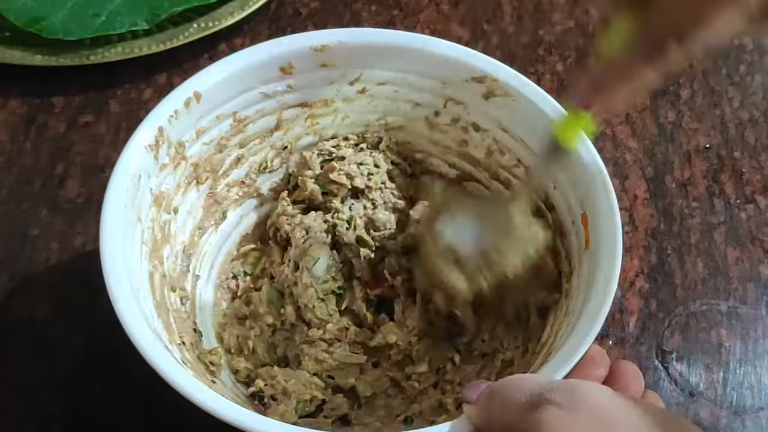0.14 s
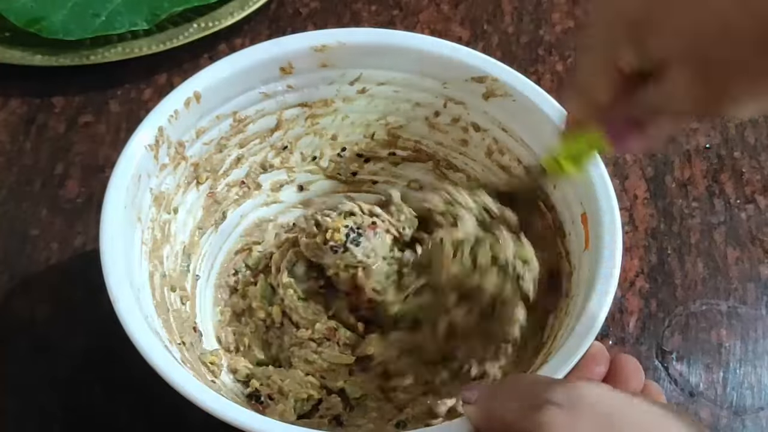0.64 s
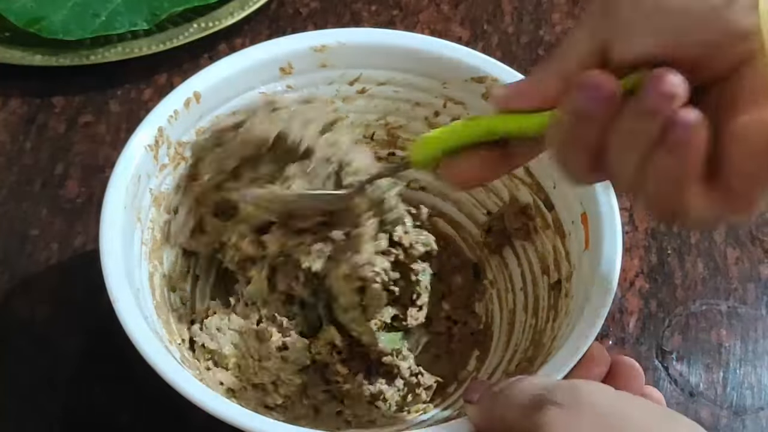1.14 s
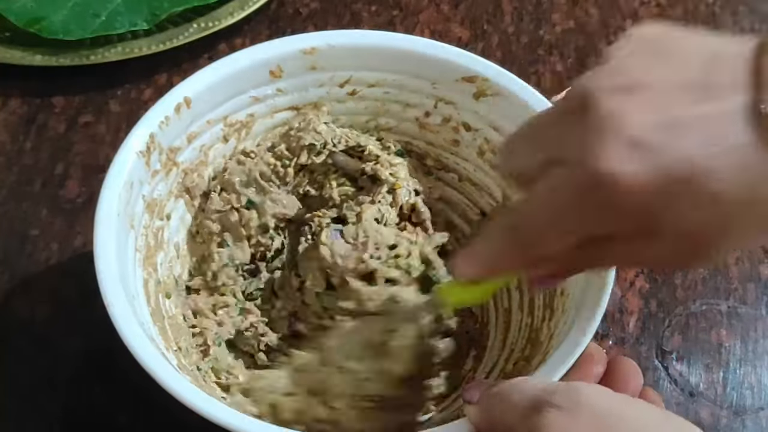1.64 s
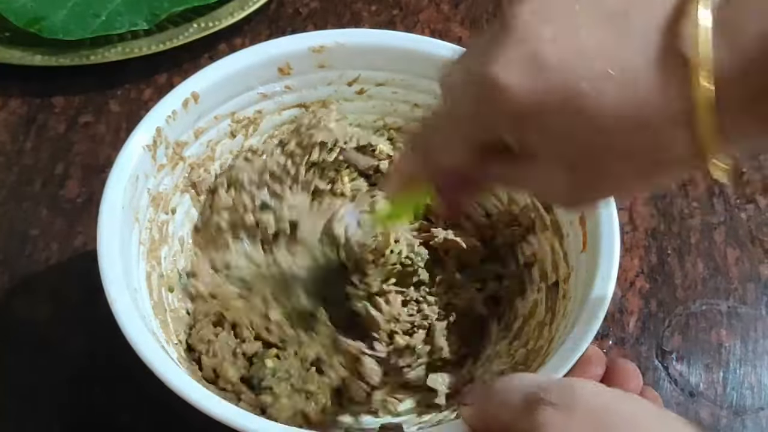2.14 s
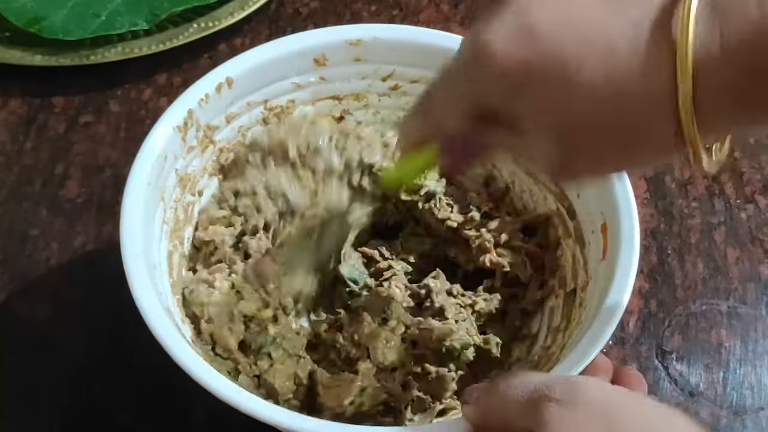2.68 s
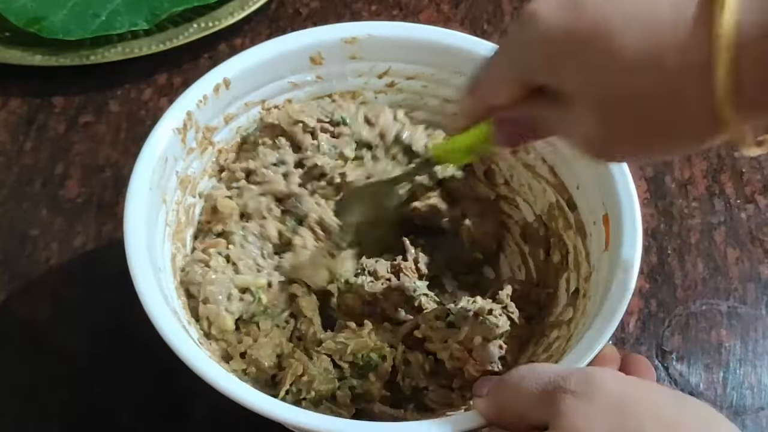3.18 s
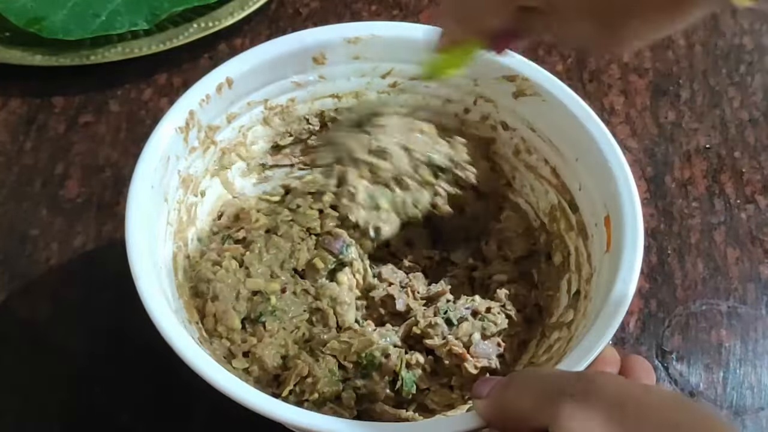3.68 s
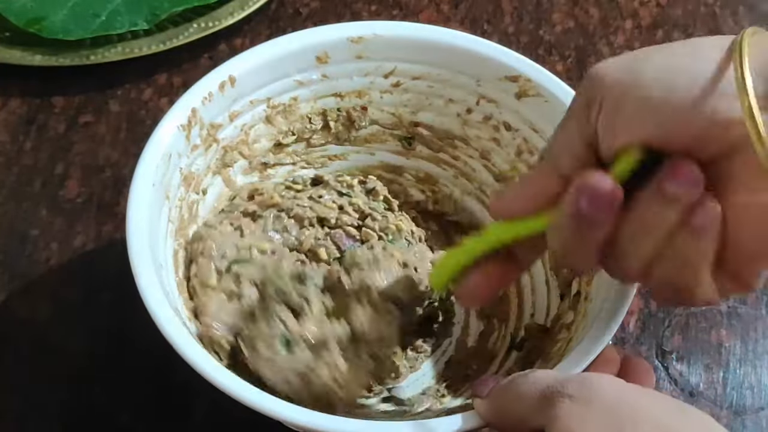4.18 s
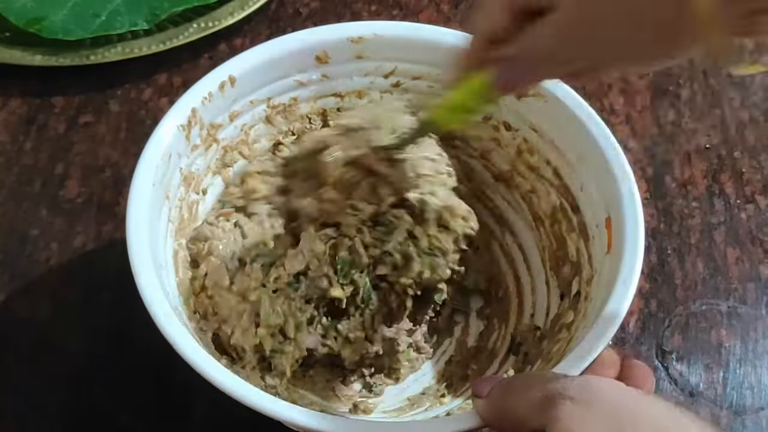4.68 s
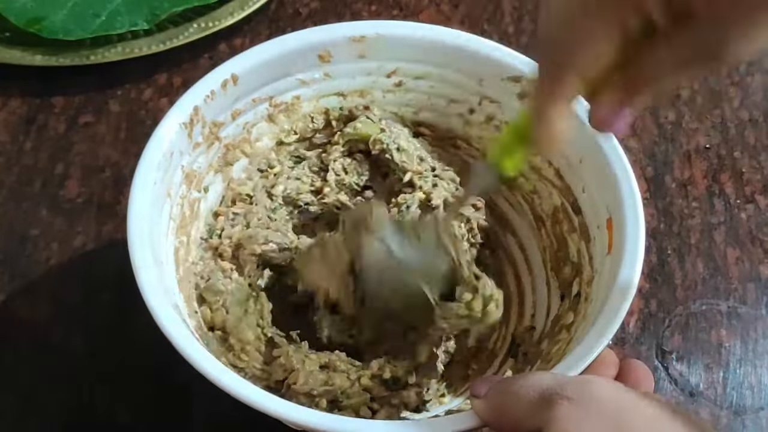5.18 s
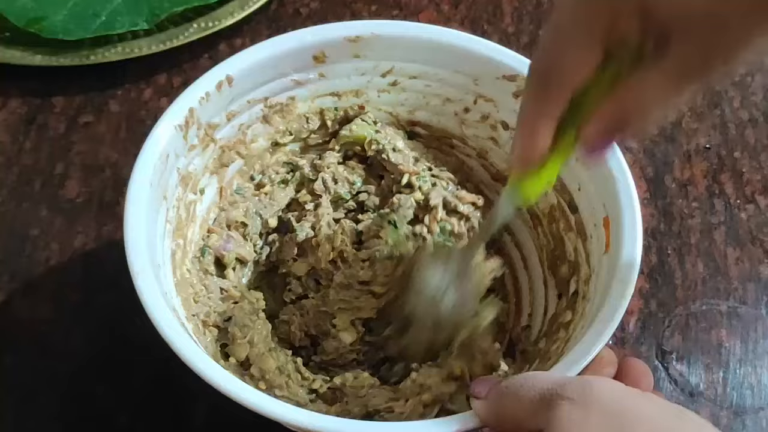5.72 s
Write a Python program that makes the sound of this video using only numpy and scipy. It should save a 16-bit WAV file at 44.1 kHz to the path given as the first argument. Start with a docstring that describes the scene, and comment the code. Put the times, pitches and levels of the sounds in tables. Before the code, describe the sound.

A metal spoon stirs thick, wet batter in a plastic bowl, recorded close in stereo in a small, reflective kitchen. From 0 to 0.3 s a fast sweep swells into a broad rubbing hiss with dense crackle, then drops abruptly to scattered pops. A light knock comes at about 1 s, followed by sticky ticks and softer crackling. A distant crow gives three short, hoarse caws at about 1.1, 1.9 and 2.75 s. The loudest hard, quickly damped knock hits at 2.3 s; a sharp cracking double knock follows at 3.03 s. Another brief hissing sweep passes at 3.35 s. From 3.6 s the work is sparser: small wet pops, ticks and faint taps, with clearer knocks at 5.2 and 5.5 s. Low draught buffeting comes and goes at left, strongest in the first 0.7 s, around 2.5-2.9 s and after 5.2 s. Faint machine hum, room murmur and steady microphone hiss lie beneath.

```python
"""A metal spoon sweeps hissing and rubbing through thick wet batter in a plastic bowl, close to two ports.
The batter crackles, ticks and pops (shaped noise and gliding sines); the spoon knocks the bowl (decaying
modes and noise cracks). Sharp sounds come back from the kitchen walls. A draught buffets the left port (low
noise), a machine hums (wavering sines), a crow caws far outside (shaky pulses through a beak), over a steady
low room murmur and microphone hiss (shaped noise)."""
import sys
import numpy as np
from scipy import signal
from scipy.fft import rfft, irfft
from scipy.io import wavfile
from scipy.ndimage import uniform_filter1d

SR = 44100
rng = np.random.default_rng(int(sys.argv[2]) if len(sys.argv) > 2 else 0)


def store_wav(level_fs):
    """Save 16-bit WAV to argv[1]."""
    pcm = np.round(np.clip(np.atleast_2d(level_fs), -1, 1) * 32767)
    wavfile.write(sys.argv[1], SR, pcm.T.astype(np.int16))


def natural_amplitude(level_db):
    """Convert a level in decibels to a linear amplitude factor, elementwise."""
    exponent = np.asarray(level_db, float) / 20
    return 10 ** exponent


N = 256960


def evened(x):
    """Scales to an rms of 1."""
    return x / np.sqrt(np.mean(x ** 2) + 1e-20)


def wander(shape, samples):
    """Random drift of rms 1: noise averaged over a number of samples."""
    return evened(uniform_filter1d(rng.standard_normal(shape), samples))


def band(x, order, low_hz, high_hz):
    """Butterworth band-pass."""
    return signal.sosfilt(signal.butter(order, [low_hz, high_hz], "band", fs=SR, output="sos"), x)


def read(points, hz):
    """Reads a spectrum on a log-frequency axis."""
    f, value = np.transpose(points)
    return np.interp(np.log(hz + 1), np.log(f + 1), value)


def causal(points):
    """Minimum-phase impulse response of a spectrum."""
    gain_db = read(points, abs(np.fft.fftfreq(4096, 1 / SR)))
    log_gain = np.log(natural_amplitude(gain_db))
    return np.fft.ifft(np.exp(np.conj(signal.hilbert(log_gain)))).real[:1024]


def curves(rows):
    """The columns of a table at every sample."""
    s, *columns = np.transpose(rows)
    return [np.interp(np.arange(N) / SR, s, c) for c in columns]


def add(mix, s, sound):
    """Mixes a sound in at a time."""
    part = mix[..., round(s * SR):][..., :sound.shape[-1]]
    part += sound[..., :part.shape[-1]]


# Response of each port with its cavity peak. Each row: frequency in Hz, gain in dB.
LEFT_PORT_HZ_DB = [(30, -4.5), (500, 6), (1200, -6.5), (4000, 10), (6000, 9.5), (7600, 18), (8900, 21.5),
                   (9600, 10), (10500, -3), (16000, -3)]
RIGHT_PORT_HZ_DB = [(30, -4), (500, -3.5), (850, -3), (1300, -6), (4000, 11.5), (6000, 18), (7600, 29),
                    (8900, 12.5), (10200, -6), (16000, 0.5)]


def ports():
    """Impulse responses of both ports; sound reaches the left one a little later."""
    left_lag_s = 0.00012
    left = np.roll(causal(LEFT_PORT_HZ_DB), round(left_lag_s * SR))
    return np.array([left, causal(RIGHT_PORT_HZ_DB)])


def heard(x):
    """A pair of signals through the ports, at rms 1."""
    return evened(signal.oaconvolve(x, ports(), axes=1)[:, :N])


def sided(sound, left_over_right_db):
    """Equal energy at both ports, tilted left or right; the mean of the ports peaks at 1."""
    tilt = natural_amplitude(np.array([[left_over_right_db / 2], [-left_over_right_db / 2]]))
    sound = sound / np.sqrt((sound ** 2).sum(1, keepdims=True)) * tilt
    return sound / abs(sound.mean(0)).max()


# Decay of the kitchen echo. Each row: frequency in Hz, t60 in s.
KITCHEN_HZ_T60_S = [(200, 0.15), (1000, 0.63), (3000, 0.27), (8000, 0.19), (16000, 0.13)]


def kitchen(x):
    """Wall reflections: sparse taps of random sign, one in every 20 samples, each band dying at its own speed."""
    taps = np.zeros((2, SR // 2))
    at = np.arange(200, SR // 2 - 20, 20)
    at = at + rng.integers(0, 20, (2, len(at)))
    np.put_along_axis(taps, at, rng.choice([-1., 1.], at.shape), 1)
    hz, t, z = signal.stft(taps, SR, nperseg=256)
    decay = natural_amplitude(-60 * t / read(KITCHEN_HZ_T60_S, hz)[:, None])
    tail = signal.istft(z * decay, SR, nperseg=256)[1]
    return signal.fftconvolve(x, tail / np.linalg.norm(tail[0]), axes=1)[:, :N]


# Spectrum of room murmur and microphone hiss. Each row: frequency in Hz, relative density in dB.
AIR_HZ_DB = [(20, 10.5), (100, -24.5), (300, -13), (600, -20), (1500, -29), (4000, -48), (8000, -46.5),
             (11500, -23.5), (16000, -27)]


def air():
    """Steady background, low room murmur and microphone hiss: shaped noise, largely shared in the bass."""
    level_db_rms = -57
    hz = np.fft.rfftfreq(N, 1 / SR)
    a, b = rfft(rng.standard_normal((2, N)))
    same = np.clip(read([(60, 0.75), (350, 0.75), (750, 0.04)], hz), 0, 1)
    right = same * a + np.sqrt(1 - same ** 2) * b
    background = irfft(np.array([a, right]) * natural_amplitude(read(AIR_HZ_DB, hz)), N)
    return natural_amplitude(level_db_rms) * heard(background)


# Machine in the next room. Each row: mean frequency in Hz, peak level in dB before waver and port gain.
HUM_HZ_DB = [(161.5, -75.5), (258.4, -74)]


def hum():
    """Low machine tones: sines wavering in pitch and level, alike at both ports but for a gain."""
    level_waver_db, pitch_waver_hz = 3.7, 2.7
    levels, pitches = wander((2, len(HUM_HZ_DB), N), 2000)
    tones = np.zeros(N)
    for (hz, db), level, pitch in zip(HUM_HZ_DB, levels, pitches):
        turns = np.cumsum(hz + pitch_waver_hz * pitch) / SR
        tones += natural_amplitude(db + level_waver_db * level) * np.sin(2 * np.pi * turns)
    return natural_amplitude([[6], [-1]]) * tones


# Caws. Each row: start in s, length in s, effort in dB before port gain, mid-caw third partial in Hz.
CAWS = [(1.08, 0.29, -56.5, 1511), (1.92, 0.27, -56, 1500), (2.749, 0.273, -57, 1510)]
# Beak resonances. Each row: centre in Hz, width in Hz, relative level in dB.
BEAK = [(993, 500, -9.5), (1510, 430, 0.5)]


def crow():
    """Shaky pulses and breath noise through beak resonances, heard directly and as reflections."""
    end_sag, end_fade_db = 0.0411, -4  # pitch and effort drop towards both ends of a caw
    out = np.zeros(N)
    for s, length_s, effort_db, third_hz in CAWS:
        t = np.arange(0, length_s, 1 / SR)
        ends = (2 * t / length_s - 1) ** 2
        shake = 1 + .03 * wander(len(t), 400)
        turns = np.cumsum(third_hz * (1 - end_sag * ends) / 3 * shake) / SR
        waver = natural_amplitude(1.5 * wander(len(t), 900))
        folds = evened(sum(np.cos(2 * np.pi * k * turns) for k in range(1, 7)))
        rattle = 1 + .4 * np.cos(2 * np.pi * 76 * t)
        drive = folds * rattle + .9 * rng.standard_normal(len(t))
        beak = sum(natural_amplitude(db) * band(drive, 2, f - w / 2, f + w / 2) for f, w, db in BEAK)
        effort = natural_amplitude(effort_db + end_fade_db * ends)
        add(out, s, effort * evened(beak) * waver * signal.windows.tukey(len(t), .3))
    return out * natural_amplitude([[1], [1.5]]) + natural_amplitude(-3) * kitchen(np.array([out, out]))


# Draught. Each row: time in s, buffeting in dB before port gain, flutter over buffeting in dB.
DRAUGHT = [(0.0, -45, -24), (0.19, -43.5, 3), (0.34, -37, -14.5), (0.47, -41, 9), (0.52, -40.5, -12.5),
           (0.65, -39, -3), (0.7, -63.5, -39), (0.96, -61.5, -10), (1.02, -79, 4), (1.09, -45.5, -32),
           (1.3, -78, 8), (2.13, -71.5, 5), (2.21, -49, -26), (2.32, -54.5, 9.5), (2.4, -49.5, -35),
           (2.47, -70, -1), (2.53, -38, -6), (2.68, -55, -38), (2.72, -35.5, -13.5), (2.81, -55.5, -11),
           (2.86, -39.5, -6.5), (2.92, -54, -1), (2.95, -52, -31), (3.03, -59, -8), (3.18, -45.5, -22),
           (3.26, -68.5, -11), (4.75, -72, 1.5), (4.96, -51.5, -24), (5.09, -51, -2), (5.13, -55.5, -35),
           (5.24, -42, -4), (5.34, -62, -10), (5.37, -44.5, -21), (5.5, -68, -2), (5.61, -62, -17),
           (5.68, -38.5, -8.5), (5.79, -53, -29), (5.83, -62, 0)]
# Draught gain in dB: one row for the left port, one for the right.
DRAUGHT_PORT_DB = [
    [5.5],
    [-47],
]


def draught():
    """Lumpy low turbulence: two bands of noise, unrelated at the two ports."""
    buffet_db, flutter_db = curves(DRAUGHT)
    a, b, lumps = rng.standard_normal((3, 2, N))
    buffet = band(a, 2, 22, 90)
    flutter = band(b, 3, 110, 240)
    lumpy = natural_amplitude(4.5 * evened(uniform_filter1d(uniform_filter1d(lumps, 900), 900)))
    turbulence = evened(buffet * lumpy ** 0.49) + natural_amplitude(flutter_db) * evened(flutter * lumpy)
    return natural_amplitude(DRAUGHT_PORT_DB) * natural_amplitude(buffet_db) * turbulence


SLIDE_UNDER_CRACKLE_DB = -10.5  # between sweeps the hiss follows the crackle

# How hard the batter is worked. Each row: time in s, crackle in dB, rub on the bowl wall in dB.
STIR = [(0.0, -38.5, -35), (0.1, -34.5, -50.5), (0.17, -31.5, -62), (0.27, -36.5, -52), (0.34, -47, -61),
        (0.62, -53.5, -72), (0.85, -61.5, -62.5), (0.95, -51, -65), (0.99, -38, -51.5),
        (1.13, -47.5, -58.5), (1.36, -52, -74), (1.4, -52, -62), (1.47, -49, -50.5), (1.6, -49, -54),
        (1.66, -50.5, -58), (1.76, -45, -54.5), (1.84, -44.5, -57.5), (1.92, -47.5, -54), (2.0, -41.5, -64),
        (2.18, -48, -67.5), (2.33, -43, -43), (2.44, -49, -57), (2.52, -43, -55), (2.64, -50.5, -58),
        (2.74, -45, -57), (2.85, -65.5, -65), (3.02, -69, -70), (3.08, -41, -39.5), (3.22, -49, -60),
        (3.37, -33.5, -53), (3.57, -50, -58.5), (3.75, -53.5, -80), (4.0, -59, -60), (4.3, -55.5, -60),
        (4.5, -50, -71), (4.62, -56.5, -67), (4.75, -66.5, -79), (4.92, -49, -54), (5.0, -46, -54.5),
        (5.05, -45, -70), (5.2, -50, -87), (5.35, -60.5, -107), (5.47, -47.5, -53.5), (5.58, -48.5, -52),
        (5.83, -56.5, -99)]
# Fast spoon sweeps. Each row: top speed reached in s, hold in s, hiss in dB, swell in dB/s, fade in dB/s.
SWEEPS = [(0.068, 0.15, -33.5, 21, 141), (3.348, 0.07, -35.5, 172, 149)]


def stir_levels():
    """Crackle, slide and rub in dB at every sample; a sweep lifts the slide above its share of crackle."""
    crackle_db, rub_db = curves(STIR)
    t = np.arange(N) / SR
    slides_db = [crackle_db + SLIDE_UNDER_CRACKLE_DB]
    for s, hold_s, db, swell, fade in SWEEPS:
        slides_db.append(db - np.maximum(swell * (s - t), 0) - np.maximum(fade * (t - s - hold_s), 0))
    return crackle_db, np.max(slides_db, 0), rub_db


def swept_db():
    """How far a fast sweep lifts the hiss over its resting share; ticks and small pops drown by as much."""
    crackle_db, slide_db, _ = stir_levels()
    return slide_db - crackle_db - SLIDE_UNDER_CRACKLE_DB


def random_hits(chance, spread_db):
    """Impulses of uneven size at random samples."""
    return natural_amplitude(spread_db * np.minimum(rng.exponential(1, N), 4)) * (rng.random(N) < chance)


def grit(per_s, spread_db, smooth):
    """Random clicks of uneven size over a share of smooth noise; each port gets its own noise."""
    bursts = signal.lfilter([1], [1, -.97], random_hits(per_s / SR, spread_db))  # time constant under 1 ms
    return (evened(bursts) + smooth) / np.sqrt(1 + smooth ** 2) * rng.standard_normal((2, N))


# Modes of the bowl. Each row: frequency in Hz, relative level in dB, undamped t60 in s.
BOWL = [(178.5, 1, 0.065), (379, -7.5, 0.058), (513, 2, 0.033), (736, -8, 0.1), (861, 8, 0.03),
        (980, 7, 0.021), (1108.7, 10.5, 0.018), (1165, 6.5, 0.029), (1287.3, 15.5, 0.017),
        (1429, 13.5, 0.018), (1520, 6, 0.016), (1780, -0.5, 0.027), (1954, 9.5, 0.01), (2200, 3, 0.013),
        (2430, -2, 0.016), (2700, 5, 0.009), (3250, 0.5, 0.0085), (3910, 0.5, 0.0088)]
RING_ON_TIMES = 3.9  # after the first thud the wall rings on, weaker and this many times longer


def bowl_ring():
    """The bowl's answer to one touch, all modes summed."""
    ring_on_db = -26
    t, ring = np.arange(8192) / SR, 0
    for hz, db, t60_s in BOWL:
        fade = natural_amplitude(-60 * t / t60_s) + natural_amplitude(ring_on_db - 60 * t / t60_s / RING_ON_TIMES)
        ring = ring + natural_amplitude(db) * fade * np.sin(2 * np.pi * hz * t)
    return ring


# Spectra of the sliding hiss and the crackle. Each row: frequency in Hz, relative level in dB.
SLIDE_HZ_DB = [(300, -39), (600, 11.5), (850, 25), (1300, 19), (2500, -7.5), (3800, 7), (5300, 10.5),
               (7000, 5), (9000, -31.5), (16000, -117)]
CRACKLE_HZ_DB = [(300, -20), (1500, 6.5), (3000, -7.5), (5000, -24), (7000, -8.5), (10000, 2.5),
                 (11500, -5.5), (16000, -12)]


def stirring():
    """Wet crackle, the hiss of the spoon sliding, and its rub ringing the bowl: coloured grit."""
    crackle_db, slide_db, rub_db = stir_levels()
    blur = .6 * natural_amplitude(1.5 * swept_db())  # a fast slide merges the crackle into hiss
    crackle = signal.oaconvolve(grit(500, 5, blur), causal(CRACKLE_HZ_DB)[None], axes=1)
    slide = signal.oaconvolve(grit(2500, 2.5, 2.5), causal(SLIDE_HZ_DB)[None], axes=1)
    rub = signal.oaconvolve(grit(600, 3., .8), bowl_ring()[None], axes=1)
    return natural_amplitude(crackle_db) * heard(crackle) + natural_amplitude(slide_db) * heard(slide) + natural_amplitude(rub_db) * heard(rub)


# Tick strength by pitch. Each row: frequency in Hz, relative level in dB.
STICKY_HZ_DB = [(600, -11), (1500, 2), (3000, -2.5), (6000, -8.5)]


def sticky():
    """Threads of batter tear off in clumps: tiny pitched ticks that glide upward."""
    per_s, over_crackle_db, spread_db, length_cycles = 260, -11.5, 6.5, 5.4
    t, out = np.arange(400) / SR, np.zeros((2, N))
    clump = natural_amplitude(6 * wander(N, 1500))
    size = random_hits(clump * per_s / SR / 1.3, spread_db)  # 1.3: about the mean of clump
    kind, side_db = rng.integers(0, 24, N), rng.uniform(-5, 5, N)
    for k, hz in enumerate(np.geomspace(600, 6000, 24)):
        u = t * hz / length_cycles
        swing = np.sin(2 * np.pi * hz * t * (1 + .1 * u))
        tick = natural_amplitude(read(STICKY_HZ_DB, hz)) * u * np.exp(-4 * u) * swing
        hits = size * (kind == k) * natural_amplitude([side_db, -side_db])
        out += signal.oaconvolve(hits, tick[None], axes=1)[:, :N]
    return natural_amplitude(stir_levels()[0] + over_crackle_db - swept_db()) * heard(out)


def small_pops():
    """Rows like POPS at random moments, their level following the crackle."""
    per_s, over_crackle_db, spread_db = 40, 4, 5.5
    low_db, spray_db = -26, -9
    when, size, side = rng.random((round(per_s * N / SR), 3)).T
    base_db = (stir_levels()[0] - swept_db())[(when * N).astype(int)]
    peak_db = base_db + over_crackle_db + spread_db * size
    return [(s, d, pan, low_db, spray_db) for s, d, pan in zip(when * N / SR, peak_db, 16 * side - 8)]


# Louder pops, ticks and the bright cracks of knocks. Each row: start in s, peak of the port mean in dB,
# left over right in dB, low end of the colour at 1500 Hz in dB, spray over snap in dB.
POPS = [(0.408, -32, -9, -35, -7), (0.445, -47, 7, -26, -5), (0.512, -34, 11, -34, -8),
        (0.5407, -33, -6, -39, -10), (0.5634, -34, 1, -33, -5), (0.606, -29, 2, -33, -8.5),
        (0.8038, -31.5, -1, -44, -5), (0.828, -39, 8, -34, -18), (0.9313, -31.5, 10, -59, -11),
        (0.967, -29, -12, -10, -6), (0.979, -25, 25, 0, 11), (1.1324, -31, 7, -28, -8),
        (1.1712, -36, -2, -13, -1), (1.2116, -29, -6, -28, -2), (1.3314, -36.5, -3, -40, 2),
        (1.3916, -28, -4.5, -24, -3), (1.4286, -33.5, -16, -2, -9), (1.4754, -37, 1, 11, -3),
        (1.5446, -37.5, 0, 20, 0), (1.5856, -37, 0, 19.5, -6), (1.6131, -27, -10, -49, 5),
        (1.6617, -31.5, -1, -51, 3), (1.7185, -32, 12, -50, -14), (1.7595, -26, 0, -29, -15),
        (1.794, -19, -7.5, -36, -26.5), (1.8283, -30.5, -0.5, 5, -10), (1.9954, -42, -8, -28, -5),
        (2.0855, -35, 0, -22, -3), (2.115, -36, -6, -27, -18), (2.213, -45, -2.0, -28, -3),
        (2.2388, -27, 3, -55, -13), (2.2737, -26, 1, -22, -13.5), (2.317, -26.5, -2.5, -16, 0),
        (2.496, -31.5, -3, 4, 11), (2.578, -29.5, -3, -29, -10), (2.6725, -44, 11, 4, -4),
        (3.032, -15.5, -4, -10, -8), (3.0462, -13, -5.5, -23, -17), (3.129, -29.5, -1, -23, 3),
        (3.1925, -22.5, -9, -33, -2), (3.2713, -43, -17, -38, -12), (3.2921, -30, -2, -11, 0),
        (3.6697, -28.5, 2, -30, 2), (3.8363, -27.5, -2, -61, -15), (3.859, -34, 3, -58, -2),
        (3.9277, -35, -6, -20, -14), (3.9602, -36.5, 26, -9, -13), (3.9805, -29, -9, -29, -2),
        (4.0295, -32, -7, -38, 4), (4.0725, -34, -3.5, -57, -18), (4.145, -29.5, -5, -53, -11),
        (4.1829, -36.5, 6, -38, -16), (4.274, -29, -7, -28, 4), (4.4812, -25.5, -6, -24, -6),
        (4.545, -31.5, -4, -51, -16), (4.6166, -39.5, 15, -38, -10), (4.7247, -30, -11, -32, -9),
        (4.8405, -35.5, 11, -49.5, -30), (4.8567, -29, 12, -54, -19), (4.896, -27, 4, -29, -20),
        (4.9128, -26, 14, -73, -14), (4.9612, -34.5, -1, 5, 0), (4.9925, -33, -1, 0, -4),
        (5.067, -35, -4, -33, -10), (5.1099, -29, 0, -51, -15), (5.167, -32, -2.5, -45, -15),
        (5.186, -34, 3, -58, -3), (5.4037, -28.5, 5, -35, -26), (5.4543, -26.5, -23, -2, -15),
        (5.465, -21, -2, 7, -9), (5.5927, -32.5, -1, -11, -3), (5.633, -34, -7, -4, -6),
        (5.677, -25.5, -5, -56, -13.5), (5.756, -36.5, -6, -35, -5)]


def pops():
    """Pops, ticks and cracks: each snaps within milliseconds and trails a short, gritty spray of noise."""
    snap_t60_s, spray_t60_s = .003, .06
    out, t, port = np.zeros((2, N)), np.arange(1536) / SR, ports()
    for s, db, pan_db, low_db, spray_db in list(POPS) + small_pops():
        gritty = natural_amplitude(5 * wander(1536, 40))
        fade = natural_amplitude(-60 * t / snap_t60_s) + gritty * natural_amplitude(spray_db - 60 * t / spray_t60_s)
        snap = rng.standard_normal(1536) * fade
        colour = causal([(300, -67.5), (1500, low_db), (8000, -23), (10000, -19.5), (12000, -20.5),
                         (16000, -37.5)])
        burst = signal.fftconvolve(np.convolve(snap, colour)[None], port, axes=1)
        add(out, s, natural_amplitude(db) * sided(burst, pan_db))
    return out


# Spoon against bowl, a blow or one ringing part of a blow. Each row: start in s, peak of the port mean in dB,
# strongest ring in Hz, left over right in dB, focus on that pitch in dB per squared octave,
# damping by batter as a factor on t60.
KNOCKS = [(0.567, -38.5, 508, 6, 19, 0.19), (0.579, -48, 736, 6, 40, 0.26),
          (0.592, -47, 2000, -3, 18, 0.74), (0.979, -30.5, 840, -2, 48, 1),
          (0.989, -25.5, 930, -0.5, 5.5, 0.87), (1.001, -31, 2200, -4, 26, 0.96),
          (1.428, -34.5, 2700, 3, 35, 0.47), (1.457, -47, 2200, -3, 9, 0.65), (1.579, -42, 890, -7, 23, 1),
          (1.83, -39, 1630, -7, 15, 0.57), (2.158, -44.5, 509, 3, 15, 0.96),
          (2.2914, -10, 1410, 1, 10, 0.38), (2.292, -25, 514, 2, 24, 0.44), (2.3, -32, 750, 0, 32, 0.47),
          (2.522, -33.5, 1800, 6, 19, 0.96), (2.541, -31.5, 1420, -5, 14, 0.75),
          (2.711, -34, 1630, 8, 26, 0.92), (2.723, -34.5, 1460, -15, 28, 0.74),
          (3.033, -17, 1240, -5, 7, 1), (3.046, -13.5, 1210, 0.5, 7, 0.62),
          (3.048, -23.5, 4000, 0, 40, 0.72), (3.063, -29.5, 1520, 18, 3, 0.53),
          (3.496, -44, 443, 8, 26, 0.75), (3.833, -47, 2700, 2, 20, 0.55), (4.038, -43, 2100, 3, 23, 0.3),
          (4.424, -51, 511, -1, 0, 0.74), (4.49, -41, 1780, 2, 34, 0.68), (4.597, -45, 2020, 3, 13, 0.54),
          (4.906, -47, 840, 9, 22, 0.76), (4.988, -42.5, 970, 2, 13, 1), (5.226, -34, 496, 9, 14, 0.41),
          (5.225, -37.5, 1150, 3, 24, 1), (5.455, -26.5, 3330, 3, 20, 0.32),
          (5.465, -24.5, 2000, -1, 4.5, 0.84), (5.467, -31, 530, 1, 22, .7),
          (5.487, -32, 1500, -3, 3, 0.82), (5.503, -34, 1300, 3, 3, 0.55),
          (5.54, -31.5, 1410, 2, 3.5, 0.88)]


def knocks():
    """Each row, a blow or part of one, rings the modes near its pitch; the ports face different wall parts."""
    ring_on_db, rise_cycles = -18, 1.28  # low modes take longer to swing up
    out, t, port = np.zeros((2, N)), np.arange(8192) / SR, ports()
    hz, mode_db, t60_s = np.transpose(BOWL)[:, :, None]
    rise = (1 - np.exp(-t * hz / rise_cycles)) ** 2
    for s, db, centre_hz, pan_db, focus_db, damping in KNOCKS:
        level_chance, phase_chance = rng.uniform(-1, 1, (2, 2, len(BOWL), 1))  # per port and mode
        near_db = mode_db - focus_db * np.log2(hz / centre_hz) ** 2 + 3 * level_chance
        fall_db = -60 * t / (t60_s * damping)
        fade = natural_amplitude(fall_db) + natural_amplitude(ring_on_db + fall_db / RING_ON_TIMES)
        ring = natural_amplitude(near_db) * fade * np.sin(2 * np.pi * hz * t + 0.83 * phase_chance)
        ringing = signal.fftconvolve((rise * ring).sum(1), port, axes=1)
        add(out, s, natural_amplitude(db) * sided(ringing, pan_db))
    return out


def scene():
    """All sources; the spoon, batter and knocks come back from the kitchen walls."""
    close = knocks() + pops() + sticky() + stirring()
    echo = kitchen(natural_amplitude(-7) * close)
    return close + echo + draught() + crow() + air() + hum()


def top_cut(x):
    """Nothing passes above the cut-off."""
    return signal.sosfilt(signal.butter(12, 15990, fs=SR, output="sos"), x)


def record(dry):
    """Limits the band to below 15850 Hz and returns the finished mix."""
    low_pass = signal.firwin(511, 15850, fs=SR)
    mix = signal.oaconvolve(dry, low_pass[None], "same", axes=1)
    return top_cut(mix)


dry = scene()
out = record(dry)
store_wav(out)
```